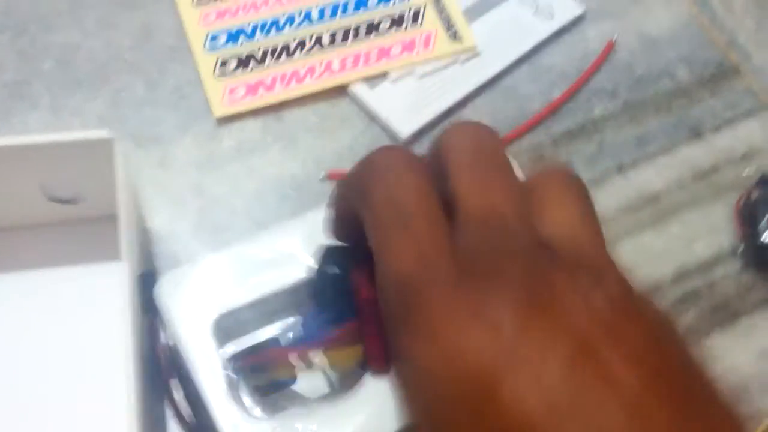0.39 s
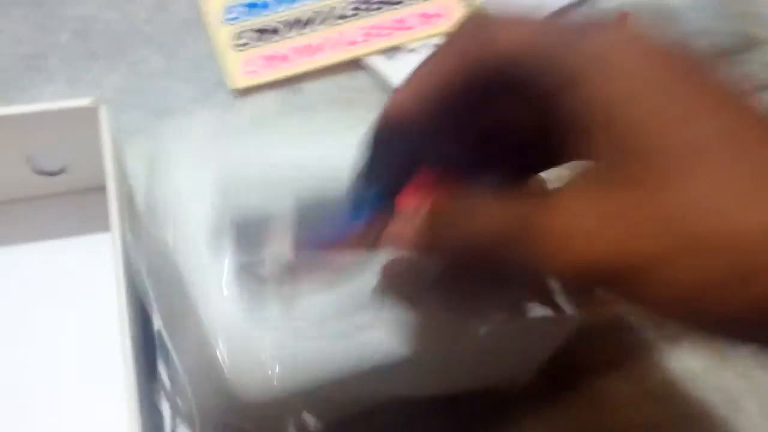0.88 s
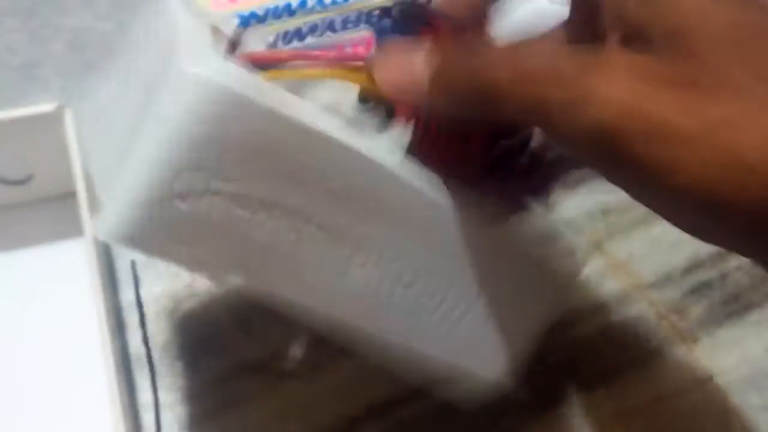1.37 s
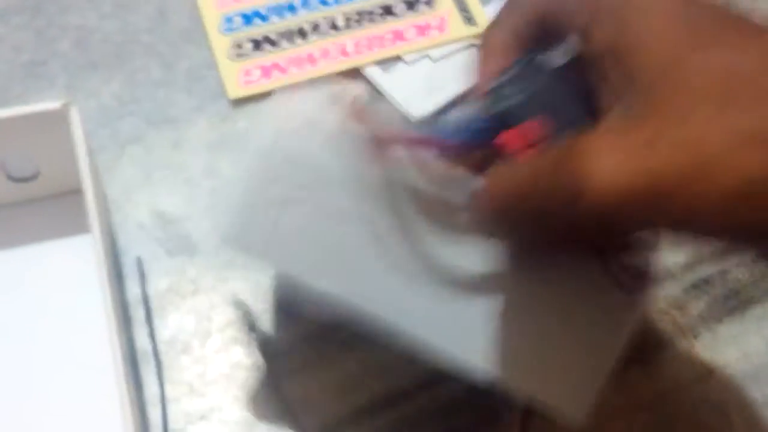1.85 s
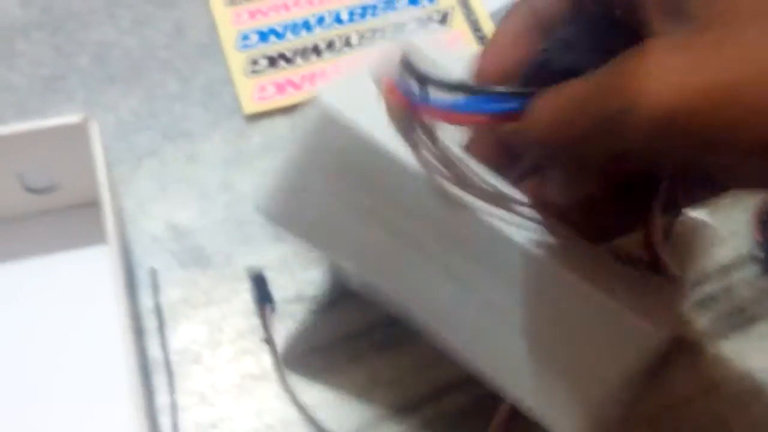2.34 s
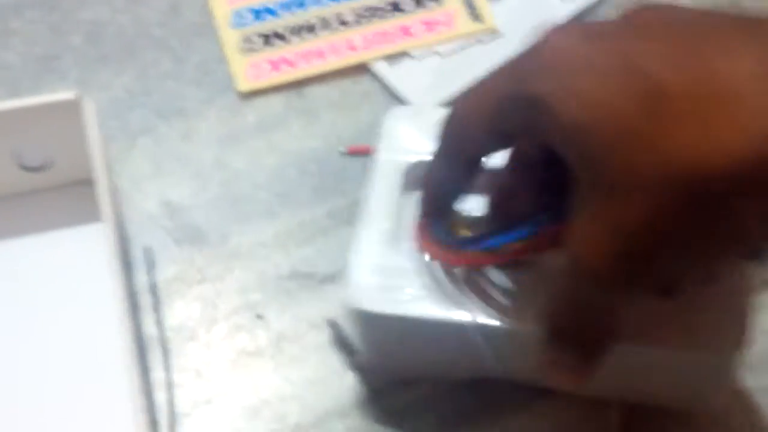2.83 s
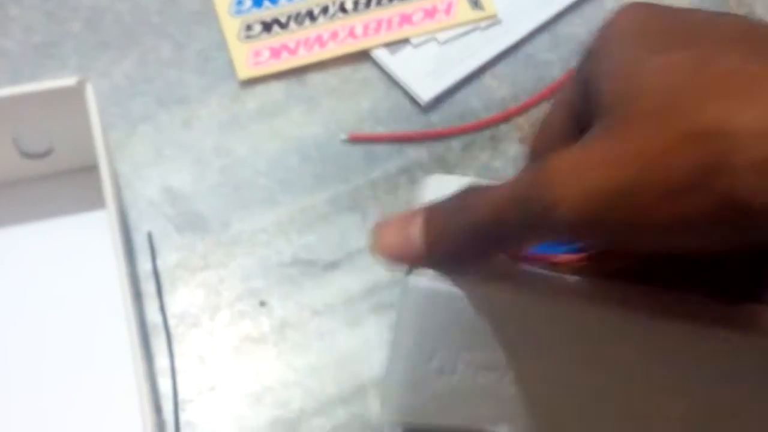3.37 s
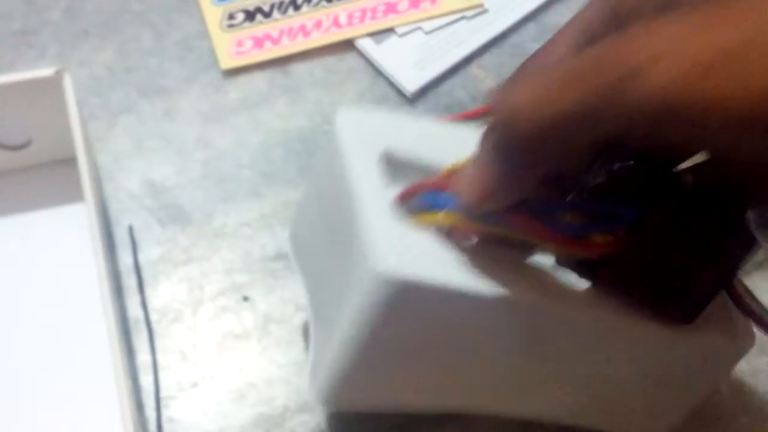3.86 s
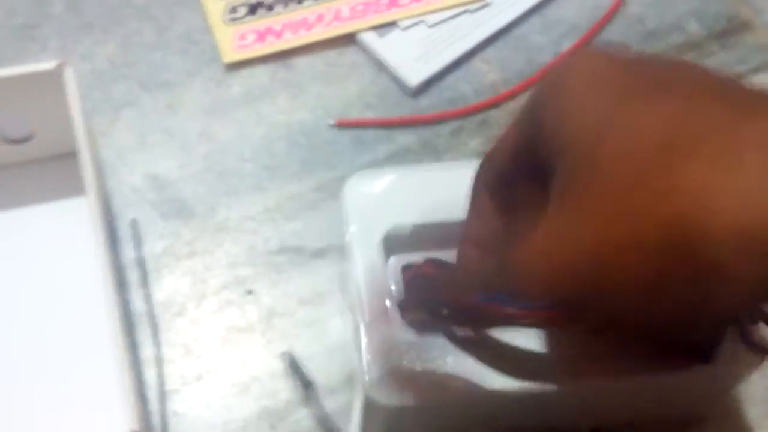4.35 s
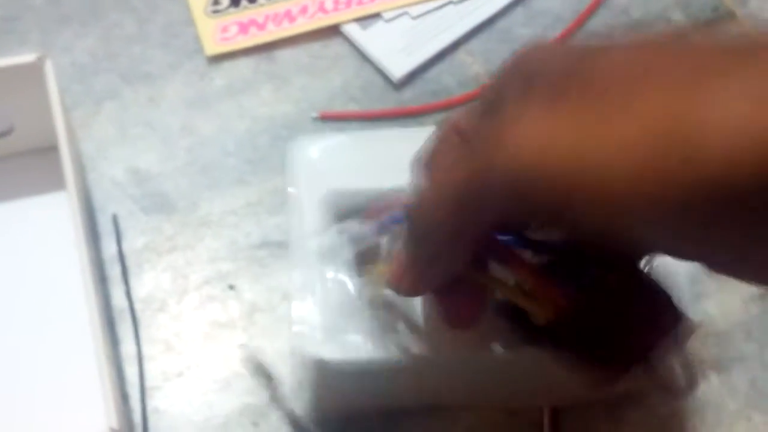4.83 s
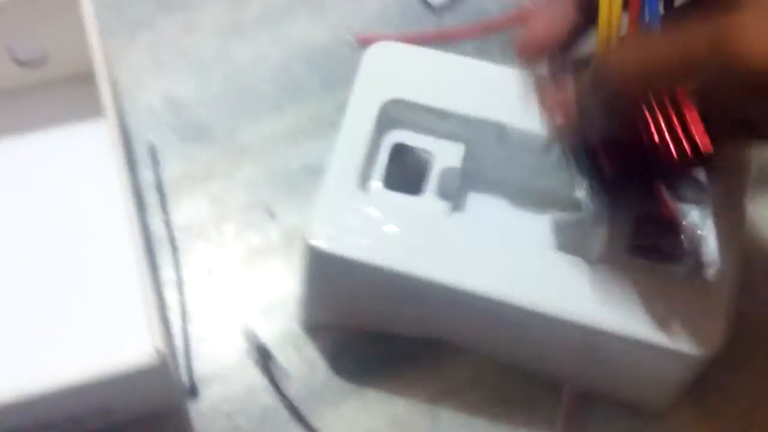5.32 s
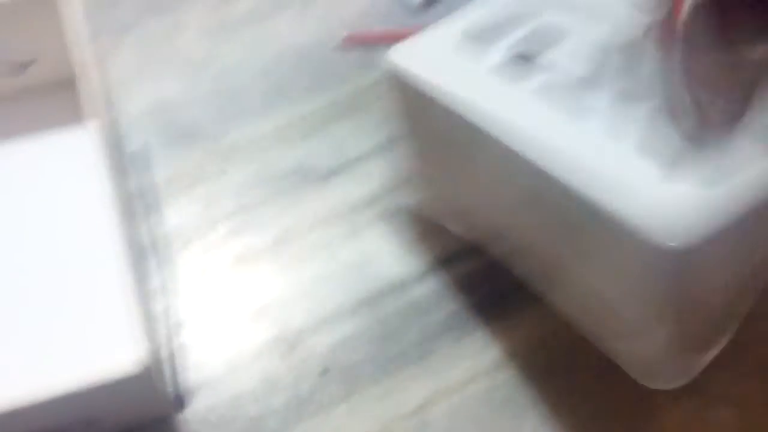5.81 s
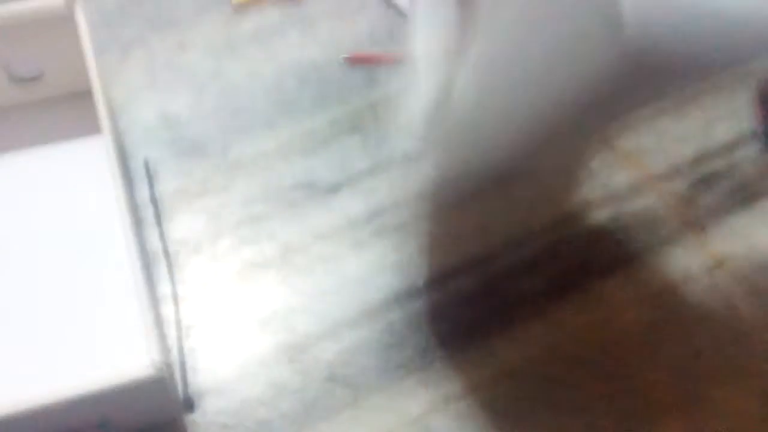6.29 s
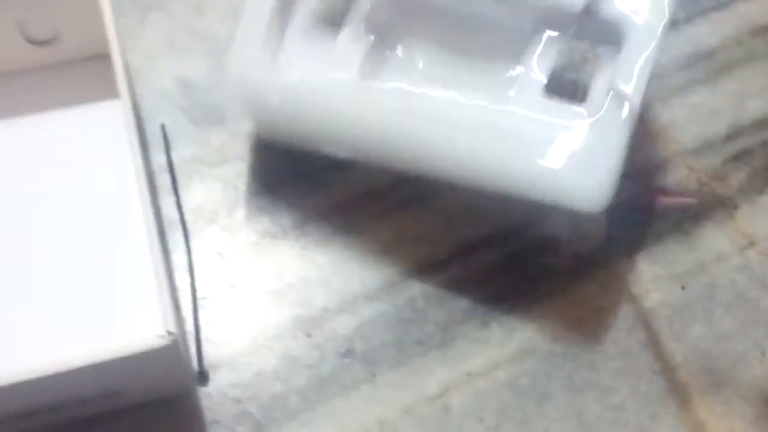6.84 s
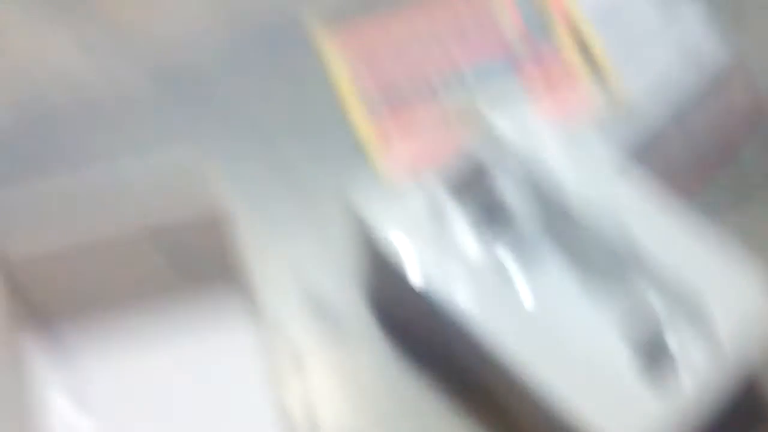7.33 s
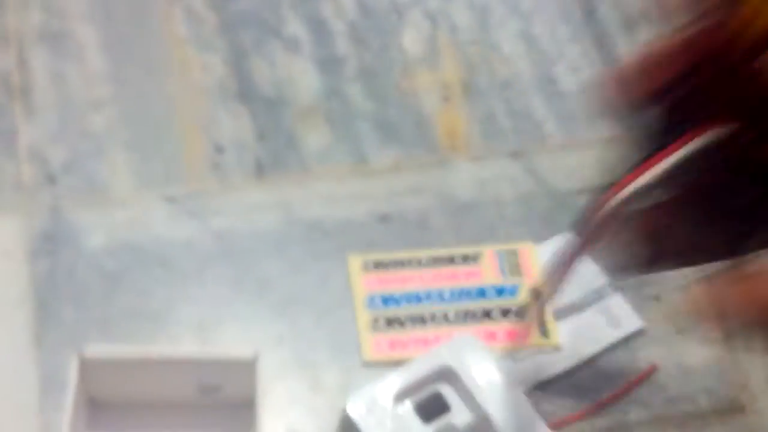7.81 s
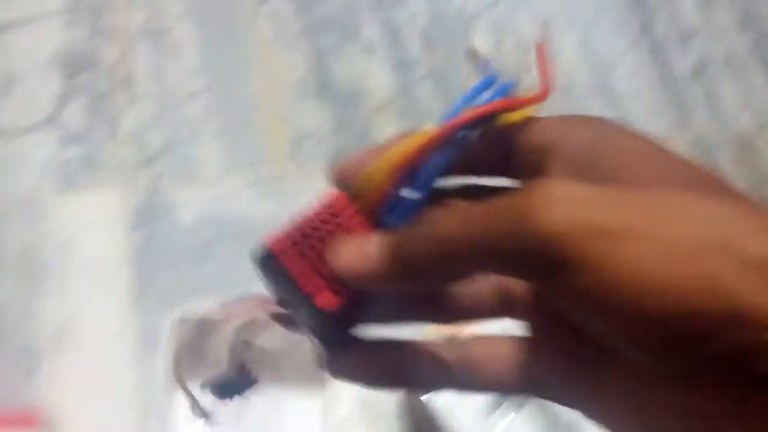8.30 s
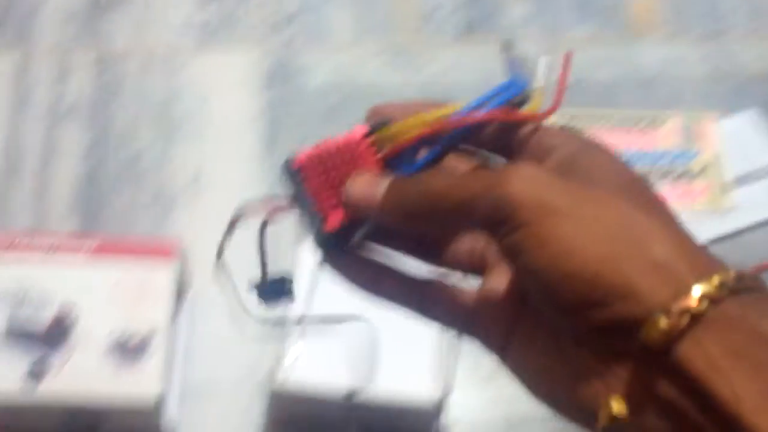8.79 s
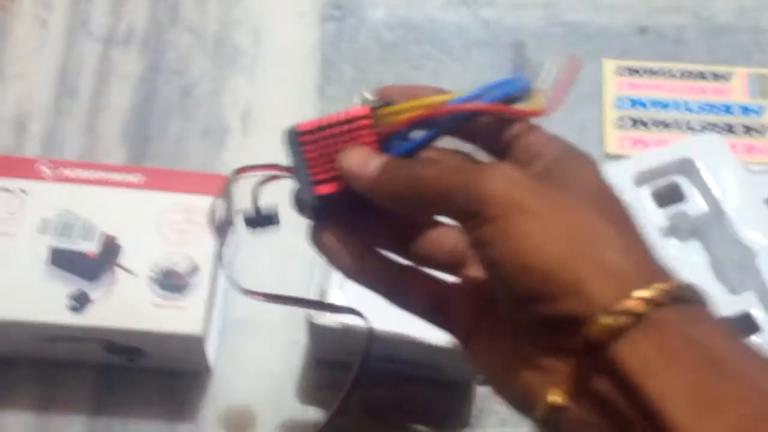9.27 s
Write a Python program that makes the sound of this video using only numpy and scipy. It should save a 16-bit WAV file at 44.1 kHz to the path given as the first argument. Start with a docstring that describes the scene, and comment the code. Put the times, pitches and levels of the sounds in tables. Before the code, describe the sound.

Brittle plastic buckles in dry, bright bursts, a hard snap early, then uneven crackling and rubbing that grows dense again before ending with low bumps on the floor. Afterwards just thin, bright ticks and faint rustles of wires over soft room air and hum. Close phone pickup in a small room, with slight overload on the strongest cracks.

```python
"""A thin moulded plastic tray on a stone floor, close to a phone: a hand works a small electronic part out of it.
Its walls buckle and snap as flurries of cracks ringing damped resonances, and wires scrape through its slots as
rubbing noise in the same resonances. It bumps the floor as low noise and soft thumps, and is dropped; then only
the wires tick, as short decaying tones, in a quiet room with a mains hum. The loudest snaps overload the phone."""
import sys
import numpy as np
from scipy import signal
from scipy.fft import rfft, irfft
from scipy.io import wavfile
from scipy.ndimage import uniform_filter1d

SR = 44100
rng = np.random.default_rng(int(sys.argv[2]) if len(sys.argv) > 2 else 0)


def master(y):
    """Save y as 16-bit WAV."""
    cut = np.clip(np.atleast_2d(y).T, -1, 1)
    pcm = np.round(cut * 32767)  # scale
    wavfile.write(sys.argv[1], SR, pcm.astype(np.int16))


def amplitude_ratio(level_db):
    """Convert a level in decibels to the matching linear amplitude (field) ratio."""
    exponent = np.asarray(level_db, float) / 20
    return 10 ** exponent


N = 426432

# the hand working the tray: (time [s], scrape level in the walls [dB], brightness [dB]);
# the ribs gain the brightness and the hollow loses it
HAND_WORK = [(0, -59.5, 2), (.3, -57, 1), (.55, -36.5, 5.5), (0.701, -53, 0), (0.869, -59, -1),
             (1.04, -45, 4), (1.22, -65, 2.5), (1.45, -70.5, 5), (1.7, -64.5, 1.5), (1.95, -49, 2.5),
             (2.2, -54.5, 6.5), (2.358, -67.5, 3.5), (2.6, -52, 0), (2.75, -55.5, 0.5), (2.95, -43, 3.5),
             (3.401, -46, .5), (3.57, -59.5, 1.5), (3.9, -46, 3.5), (4.201, -57.5, 2.5), (4.38, -42.5, -1),
             (4.6, -55, -0.5), (4.852, -50.5, 6.5), (5.08, -43.5, 3), (5.3, -50.5, -4.5), (5.6, -49, -0.5),
             (5.818, -68.5, 2), (6.099, -59.5, 4.5), (6.25, -44, 2), (6.75, -39.5, -3), (7.0, -55, 1.5),
             (7.2, -42.5, -10), (7.379, -85.5, -0.5)]
# tray resonances, broad because the thin plastic is heavily damped: (centre [Hz], width [Hz], level [dB])
HOLLOW_MODES = [(236, 260, -6.5), (409, 110, -5.5), (651, 73, -2.5), (985, 42, -0.5), (1240, 190, -1)]
WALL_MODES = [(1695, 590, -5), (2057, 218, 2.5), (2440, 320, 1.5), (2910, 910, -2.5)]
RIB_MODES = [(3780, 690, -7), (4440, 1000, -2), (5430, 910, -1.5), (6380, 500, -5.5), (6360, 1000, -12.5)]
FAMILIES = (HOLLOW_MODES, WALL_MODES, RIB_MODES)
OPPOSITE = np.array([[1], [-1]])  # left plus, right minus


def rms1(x):
    """Scale to unit rms."""
    return x / np.sqrt(np.mean(x ** 2))


def on_hz(table, count):
    """A (Hz, value) table read on the bins of a transform of count samples."""
    hz, value = np.transpose(table)
    bins_hz = np.arange(count // 2 + 1) * SR / count
    return np.interp(np.log(bins_hz + 1), np.log(hz), value)


def coloured(table):
    """Noise with the given spectrum, unit rms."""
    spectrum = rfft(rng.standard_normal(N)) * amplitude_ratio(on_hz(table, N))
    return rms1(irfft(spectrum, N))


def walk(rate):
    """Random levels held 1 / rate s and slewed twice, unit rms."""
    hold = int(SR / rate)
    steps = np.repeat(rng.standard_normal(N // hold + 1), hold)
    return rms1(uniform_filter1d(uniform_filter1d(steps, hold), hold)[:N])


def work_db(s):
    """Scrape level in hollow, walls and ribs at the times s; silent once the tray is dropped."""
    at, db, bright_db = np.transpose(HAND_WORK)
    wall_db = np.interp(s, at, db, right=-120)
    bright_db = np.interp(s, at, bright_db)
    return np.array([wall_db + 0.5 - bright_db, wall_db, wall_db + 2 + bright_db])


def rings(modes, count, scatter_db, bend):
    """Responses of a resonance family; grip and place of each blow shift pitch and weight."""
    hz, width, db = np.transpose(modes)[:, :, None]
    t = np.arange(1024) / SR
    chance = rng.standard_normal((count, 2, len(modes), 1))
    together = rng.standard_normal((count, 1, 1))  # the grip also bends the whole family at once
    bent_hz = hz * (1 + bend * (chance[:, 1] + together))
    shapes = np.exp(-np.pi * width * t) * np.cos(2 * np.pi * bent_hz * t)
    sign = (-1.) ** np.arange(len(modes))[:, None]  # neighbours in opposite sign leave no holes between them
    weight = np.sqrt(width) * amplitude_ratio(db + scatter_db * chance[:, 0]) * sign
    return np.sum(weight * shapes, axis=1)


def snaps():
    """Walls buckle: each snap is a flurry of tiny cracks that swells, dies and rings the three families."""
    # snaps and knocks: (time of the peak [s], energy in the walls [dB over 10 ms],
    # hollow [dB above the walls], ribs [dB above the walls], length [ms])
    snap_list = [(0.0314, -44.5, -4, -1, 6), (0.095, -42, -2, -3, 12), (0.1332, -33.5, -11, -17, 3.1),
                 (0.1695, -36.5, -22, 4, 4.1), (0.2584, -48.5, -4, 13, 3.6),
                 (0.3459, -41, -3.5, -3.5, 17.1), (0.364, -29, -20.5, 1.5, 5.7),
                 (0.4291, -35, -4, -3.5, 3.6), (0.4365, -29, -15.5, 3.5, 8), (0.4583, -28.5, -15, 8, 3),
                 (0.4655, -22, -2.5, -1.5, 11.8), (0.484, -15, -8, 2, 6.4), (0.4932, -8.5, -8, 0, 16.5),
                 (0.6156, -36.5, -7, 1.5, 8.0), (0.6268, -38.5, -5, 3, 10.8),
                 (0.6977, -30.5, -3.5, -5.5, 31), (0.8456, -50, -10, -1, 6.4),
                 (0.9559, -43.5, -1.5, -2.5, 5.8), (0.9853, -37.5, -5, 0, 5.0),
                 (1.0579, -44.5, -6, 7, 14.2), (1.0792, -42.5, -17, 1, 5.8), (1.1353, -46, -4.5, 1, 5.1),
                 (1.192, -39.5, -5.5, -4.5, 14), (1.2872, -43.5, -20, -0.5, 3.6),
                 (1.5543, -41, 1, -2.5, 30), (1.7108, -36, -18.5, -2, 12), (1.8014, -25.5, -6, -5.5, 7.3),
                 (1.852, -40.5, -15, 10.5, 4.2), (1.9239, -23, -2.5, -5, 23),
                 (1.9496, -27.5, -3.5, -5.5, 15.8), (1.9639, -30.5, -4, 3.5, 16.9),
                 (1.9884, -31.5, -5.5, 1.5, 3.9), (2.1138, -36.5, -7.5, 4.5, 4.4),
                 (2.1202, -31.5, -8, 7.5, 8.2), (2.131, -13.5, -10.5, 1.5, 12),
                 (2.2141, -37, -17.5, -0.5, 5.2), (2.4468, -36, -6, 0, 8.3), (2.466, -32.5, -12.5, -9, 14),
                 (2.5626, -37.5, -4.5, 1.5, 6.1), (2.5798, -28, -4, -7.5, 9.9),
                 (2.6453, -29, -11, -0.5, 8.6), (2.6613, -32.5, -13, -10, 5.8), (2.6819, -29.5, -22, -6, 9),
                 (2.697, -28.5, -14, -9.5, 9.3), (2.782, -39, 0, -4, 12), (2.8265, -40, -16, -4, 5.1),
                 (2.8424, -36.5, -20, -8.5, 5), (2.8633, -31.5, -13, -4, 5.5),
                 (2.8786, -30.5, -5.5, -2.5, 7.9), (2.8903, -32, -0.5, 7, 7.2),
                 (2.9671, -23.5, -16, -7, 6.1), (2.9919, -38, -14, 3, 4.7), (3.02, -28.5, -20, -4.5, 7),
                 (3.0417, -28.5, -4, 1, 3.9), (3.0684, -41.5, -3, 13, 3), (3.0815, -30, -17, 5.5, 2.9),
                 (3.1478, -38, -5.5, 10, 4.8), (3.1522, -32.5, -8.5, 6, 5.6),
                 (3.2029, -37.5, -6.5, -3.5, 6.7), (3.2186, -41.5, -2.5, -2.5, 20.5),
                 (3.2651, -54, 3.5, 17.5, 4.9), (3.2907, -35.5, -2, 3, 7.8), (3.3156, -35, -9.5, 8.5, 6.3),
                 (3.3301, -28.5, -17.5, -7, 3), (3.3584, -36, -8, 2.5, 19), (3.3699, -30.5, -6.5, 1.5, 6.2),
                 (3.387, -34, -16, 1.5, 8.0), (3.4012, -35.5, -5, -4, 6.3), (3.4589, -28, -3.5, 0, 5.3),
                 (3.488, -35.5, 0.5, 2.5, 10.4), (3.514, -29.5, -17, 0.5, 5.4),
                 (3.6125, -42.5, -6, -7, 3.9), (3.6239, -43.5, -8, -4, 3), (3.6628, -26, -14, 4, 3.9),
                 (3.7639, -36.5, -12.5, -4, 4.4), (3.8464, -17.5, -16.5, 6, 8.7),
                 (3.8668, -32, -6.5, 9.5, 15.9), (3.8795, -24.5, -13, 1.5, 6.5),
                 (3.9768, -35, -11.5, 2, 7.2), (3.9884, -17, -17, 5, 5.3), (4.0904, -38, 3.5, 1, 16.6),
                 (4.1206, -45, -3, 23, 2.5), (4.2535, -36, 0, 2.5, 5.2), (4.3015, -22.5, -10.5, -4.5, 17),
                 (4.315, -18, -10.5, -1.5, 7.2), (4.3405, -24.5, -0.5, -4, 16),
                 (4.4207, -37.5, -8, -6.5, 8.6), (4.4594, -31, -4.5, 2, 6.5), (4.4688, -24.5, -13, -7, 7.3),
                 (4.4947, -29, -12, -7, 2.7), (4.5416, -43.5, -1.5, 4, 9.5), (4.7274, -41, -5, 4, 8.8),
                 (4.7927, -29, -12, 1, 3.6), (4.8021, -25, -6, -1, 6.7), (4.8154, -30.5, -7.5, -5, 17),
                 (4.8347, -21.5, -15.5, -9, 3.1), (4.8904, -41, -24, 11, 2.4),
                 (4.93, -10.5, -29.5, -9, 3.7), (4.942, -25, -6, -2, 4.6), (4.9865, -9.5, -14, -3.5, 17),
                 (5.0127, -18, -11, 2.5, 7.1), (5.0234, -25, -6, 4, 12.6), (5.1089, -33, -1.5, 0, 19.8),
                 (5.133, -34.5, 5.5, -2.5, 37), (5.1757, -26.5, -4.5, -2, 7.9),
                 (5.3052, -38.5, 3.5, -11, 25), (5.3775, -20, -1.5, -6.5, 10), (5.4857, -35, 3, -10.5, 5.5),
                 (5.5083, -39, 6, -8.5, 10), (5.5735, -38.5, 2, -8, 5.8), (5.6282, -36, -14, -7.5, 14),
                 (5.7324, -49.5, 5, 3.5, 23), (5.883, -32, -25, 4.5, 6.9), (5.9342, -41.5, -18, -4, 3.1),
                 (5.979, -30.5, -11.5, 0, 9.6), (5.9976, -23.5, -1, -1.5, 16), (6.0219, -29.5, -2.5, 1, 16),
                 (6.062, -40, -0.5, 4, 5.1), (6.1612, -33, -13, -5, 5.7), (6.1715, -28, -11.5, -1.5, 12.0),
                 (6.1937, -21.5, -6, 3, 10.4), (6.2252, -22.5, -12, -6, 11), (6.302, -25.5, -8, -3.5, 13),
                 (6.3369, -25, -9, 2.5, 9.4), (6.3479, -23, -5.5, 1, 13.0), (6.3616, -28, -4, -2, 11.1),
                 (6.37, -25.5, -12, -4.5, 14.0), (6.3908, -22.5, -19, 0.5, 5.3),
                 (6.4207, -32.5, -11, 2, 8.0), (6.432, -29, -11.5, -8.5, 6.5),
                 (6.5082, -23, -15.5, -3.5, 10.8), (6.5297, -19.5, -19, 4, 5.8),
                 (6.5383, -17, -15.5, -1.5, 9.9), (6.5517, -22, -16.5, 6.5, 12.9),
                 (6.5641, -14, -20.5, 1.5, 15.4), (6.5821, -18, -16.5, -1, 13), (6.6647, -10, -15, 0.5, 13),
                 (6.691, -21, -11, -2, 9.4), (6.7005, -23, -6, -1, 20), (6.8683, -33.5, -3.5, -0.5, 20),
                 (6.8917, -23.5, -9.5, -5.5, 15), (6.9693, -39, -3, 1.5, 10.5),
                 (7.0389, -18, -2.5, -3, 12.7), (7.057, -30.5, -1.5, -1, 6.1),
                 (7.0654, -24.5, -2, -1.5, 10.9), (7.1136, -16.5, -4.5, -6, 21), (7.1439, -29.5, 1, -6, 18),
                 (7.1813, -26.5, 0, -8.5, 8.6), (7.1964, -30, 3.5, -10.5, 24.6)]
    s, wall_db, hollow_db, ribs_db, length = np.transpose(snap_list)
    family_db = np.array([wall_db + hollow_db, wall_db, wall_db + ribs_db])

    # lesser snaps come at random while the hand works, about as loud as the scrape
    small_per_s, small_mean_ms = 60, 2.6
    small_db, level_scatter_db, colour_scatter_db = 0.5, 4.5, 4  # above the scrape; scatters are limits either way
    when, size = rng.random((600, 2)), rng.uniform(-1, 1, (600, 4))
    at = np.cumsum(-np.log(1 - when[:, 0]) / small_per_s)
    on = at < HAND_WORK[-1][0]
    lesser_db = work_db(at) + small_db + level_scatter_db * size[:, 0] + colour_scatter_db * size[:, 1:].T
    lesser_length = -small_mean_ms * np.log(1 - when[on, 1])
    s = np.r_[s, at[on]]
    length = np.r_[length, lesser_length][:, None]
    family_db = np.c_[family_db, lesser_db[:, on]][:, :, None]

    # shares of the length taken by rise and fall, each to -10 dB; the start is abrupt
    rise, fall = np.maximum(0.31 * length, .1), np.maximum(0.59 * length, .15)
    ms = (np.arange(3072) - 1024) * 1000 / SR
    swell = np.where(ms < 0, (ms / rise) ** 4, ms / fall)
    chance = rng.standard_normal((len(s), 2, 3072))
    flurry = chance[:, 0] * amplitude_ratio(3.0 * chance[:, 1] - 10 * swell)
    cracks = rfft(flurry + 3.2 * (ms == 0), 4096)  # one main crack at the peak
    sound = 0
    for modes, db in zip(FAMILIES, family_db):
        response = rfft(rings(modes, len(s), scatter_db=1.0, bend=0.059), 4096)
        ring = irfft(cracks * response, 4096)
        energy = np.sum(ring ** 2, axis=1, keepdims=True)
        sound = sound + amplitude_ratio(db) * ring / np.sqrt(energy / (SR / 100))
    out = np.zeros(N + 8192)
    for start, blow in zip((s * SR).astype(int), sound):
        out[start:start + 4096] += blow
    return out[1024:N + 1024]


def scrape():
    """Wires and fingers drag over the plastic in fits: a fine rub and small cracks ring the same families."""
    fits = amplitude_ratio(1.3 * walk(90) + 1.5 * walk(25))
    rub = rng.standard_normal(N)
    struck = rng.random(N) < 1100 / SR  # 1100 small cracks per second
    cracks = struck * rng.standard_normal(N) * amplitude_ratio(4.0 * rng.standard_normal(N))
    # the grip shifts every 50 ms or so among five, and the colour with it
    held = np.repeat(rng.integers(0, 5, N // 2048 + 1), 2048)[:N]
    grip = held == np.arange(5)[:, None]
    drag = grip * fits * (0.75 * rub + rms1(cracks))
    out = 0
    for modes, db in zip(FAMILIES, work_db(np.arange(N) / SR)):
        responses = rings(modes, count=5, scatter_db=5.0, bend=0.08)
        ring = signal.oaconvolve(drag, responses, axes=1).sum(axis=0)[:N]
        out = out + rms1(ring) * amplitude_ratio(db)
    return out


def tick(hz):
    """A loose wire's tick: a sine of a cycle or two, its bandwidth a fifth of its pitch."""
    t = np.arange(256) / SR
    return np.exp(-np.pi * 0.2 * hz * t) * np.sin(2 * np.pi * hz * t)


def wires():
    """Loose wires tick against each other, thin and bright, over short faint rustles of tinier ticks."""
    # single ticks, before the bass is cut: (time [s], peak level [dB], centre [Hz])
    tick_list = [(7.5353, -31, 5140), (7.559, -38.5, 3360), (7.656, -37, 3380), (7.731, -38.5, 4610),
                 (7.7464, -44, 6480), (7.78, -42, 4320), (7.8095, -34.5, 3880), (7.8585, -47, 5860),
                 (7.926, -47, 4370), (7.9657, -47, 5300), (8.1231, -17, 5720), (8.1477, -48.5, 5560),
                 (8.1672, -25.5, 6000), (8.463, -33.5, 5150), (8.852, -45, 3900), (8.9484, -23, 5550),
                 (8.9722, -34, 1990), (9.0332, -32, 5940), (9.5351, -35, 4760)]
    # rustles while the hand gathers the wires: (middle [s], half length to -10 dB [s], level [dB])
    rustle_list = [(7.585, .08, -60), (7.831, 0.17, -57), (8.189, 0.078, -60.5), (8.976, 0.039, -62.5)]
    struck = rng.random(N) < 800 / SR  # 800 tiny ticks per second
    tiny = struck * rng.standard_normal(N) * amplitude_ratio(3.1 * rng.standard_normal(N))
    t = np.arange(N) / SR
    swell = sum(amplitude_ratio(db - 10 * ((t - s) / half) ** 2) for s, half, db in rustle_list)
    rustle = rms1(np.convolve(tiny, tick(5230))[:N])
    out = rustle * swell * amplitude_ratio(2.5 * walk(25))
    for s, peak_db, hz in tick_list:
        start = int(s * SR)
        out[start:start + 256] += amplitude_ratio(peak_db) * tick(hz) / tick(hz).max()
    return signal.sosfilt(signal.butter(4, 1920, "high", fs=SR, output="sos"), out)


def bumps():
    """Dull handling rumble through floor and phone, and soft thumps of two or three cycles, alike at both ports."""
    # rumble through floor and phone: (time [s], level [dB])
    rumble_level = [(0, -54), (0.5, -44.5), (0.801, -54), (1.399, -56.5), (1.9, -43), (2.3, -51),
                    (3.6, -55.5), (4.1, -48), (5.2, -49), (5.8, -55.5), (6.3, -41.5), (7.2, -37.5),
                    (7.451, -58), (9.67, -63.5)]
    # rumble spectrum: (frequency [Hz], relative density [dB per Hz])
    rumble_colour = [(25, -24), (55, -3.5), (100, 0.5), (140, -6.5), (250, -14.5), (400, -20), (700, -44.5)]
    # soft thumps of fingers, tray and floor: (time of the peak [s], level, 1.5 dB over the sine's peak [dB],
    # pitch [Hz])
    thump_list = [(0.079, -35, 66), (0.175, -36, 74), (0.503, -28, 143.5), (1.712, -31, 131),
                  (1.946, -31, 114), (2.3, -32.5, 119), (2.475, -35, 93), (3.372, -36, 116),
                  (3.469, -34.5, 141), (4.056, -34, 85), (4.088, -32, 102), (4.238, -33, 96),
                  (4.821, -32, 175), (4.998, -28, 128.7), (5.383, -31, 158), (5.498, -35, 126),
                  (6.285, -26.5, 157), (6.657, -21, 170), (6.743, -29, 117), (6.805, -24, 111),
                  (6.99, -31, 137), (7.039, -31, 126), (7.106, -23, 98), (7.16, -29, 101),
                  (7.204, -30, 100), (7.257, -31, 108), (7.304, -28.5, 95)]
    s, db = np.transpose(rumble_level)
    level = amplitude_ratio(np.interp(np.arange(N) / SR, s, db) + 2.0 * walk(20))
    side = amplitude_ratio(-24) * coloured(rumble_colour) * OPPOSITE  # the ports differ only slightly
    out = level * (coloured(rumble_colour) + side)
    t = np.arange(-2048, 2048) / SR
    for (at, peak_db, hz), turn in zip(thump_list, rng.random(len(thump_list))):
        swell = np.exp(-(t * hz / np.where(t < 0, .9, 1.5)) ** 2)  # rises faster than it falls
        thump = amplitude_ratio(peak_db - 1.5) * swell * np.sin(2 * np.pi * (hz * t + turn))
        middle = int(at * SR)
        out[:, middle - 2048:middle + 2048] += thump
    return out


def room_tail():
    """Decaying noise for the small room: the treble dies sooner and differs more between the ports."""
    room_db, t60_s, treble_t60_s = -8, 0.22, 0.17  # energy of the shared part against the direct sound
    t = np.arange(SR // 2) / SR
    noise = rng.standard_normal((2, len(t))) * np.minimum(t / 0.0013, 1)
    low = signal.sosfilt(signal.butter(2, 3000, fs=SR, output="sos"), noise)
    alike, unlike = low * amplitude_ratio(-60 * t / t60_s) + (noise - low) * amplitude_ratio(-60 * t / treble_t60_s)
    unlike = signal.sosfilt(signal.butter(1, 2500, "high", fs=SR, output="sos"), unlike)
    return amplitude_ratio(room_db) / np.sqrt(np.sum(alike ** 2)) * (alike + 0.34 * unlike * OPPOSITE)


def at_ports(x):
    """Close sound and its room tail reach two ports on the phone body, each with its own lead and shade."""
    # lead of the left port: (frequency [Hz], phase [radians])
    port_phase = [(600, .1), (2500, .2), (3600, .8), (4700, 1.9), (5700, 2.1), (8000, 2.2)]
    # shade of the body: (frequency [Hz], left minus right [dB])
    port_db = [(150, 0), (520, 2), (1200, 4), (2600, 2), (6000, 3)]
    turn = amplitude_ratio(on_hz(port_db, N) / 2) * np.exp(.5j * on_hz(port_phase, N))
    direct = x * amplitude_ratio(1.4 * walk(30) * OPPOSITE)  # the tray moves between the ports
    wet = direct + signal.fftconvolve(x[None], room_tail())[:, :N]
    return irfft(rfft(wet) * np.array([turn, 1 / turn]), N)


def quiet_room():
    """Steady room air as coloured noise, most alike left and right in the bass, and a wavering mains hum."""
    # spectrum of the air: (frequency [Hz], relative density [dB per Hz])
    air_colour = [(30, -28), (50, -17), (100, -16), (140, -15.5), (350, -26.5), (700, -31.5), (1400, -38),
                  (4500, -36), (8000, -43)]
    # spread of the air: (frequency [Hz], side minus mid [dB])
    air_side = [(60, -12), (200, -6), (900, -3), (2650, -1), (7800, 9)]
    noise = rfft(rng.standard_normal((2, N))) * amplitude_ratio(on_hz(air_colour, N))
    mid, side = irfft(noise * amplitude_ratio([np.zeros(N // 2 + 1), on_hz(air_side, N)]), N)
    air = amplitude_ratio(-60.5) / np.std(mid) * (mid + side * OPPOSITE)
    hum_phase = 2 * np.pi * 100 * np.arange(N) / SR + 0.24 * walk(5.4)  # 100 Hz
    hum = amplitude_ratio(-58 + 1.7 * walk(7.7)) * np.sqrt(2) * np.sin(hum_phase)
    return air + hum


def scene():
    """Tray and wire sounds through ports and room, over bumps and the quiet room."""
    return at_ports(snaps() + scrape() + wires()) + bumps() + quiet_room()


def low_pass(x):
    """Removes everything above the highest recorded frequency."""
    return signal.sosfilt(signal.butter(12, 8410, fs=SR, output="sos"), x)


def record(dry):
    """The phone drops the deepest bass, rolls off and cuts the treble, then clips the loudest snaps flat."""
    soft = signal.sosfilt(signal.butter(2, 38, "high", fs=SR, output="sos"), dry)
    soft = signal.sosfilt(signal.butter(6, 7100, fs=SR, output="sos"), soft)
    cut = signal.sosfilt(signal.ellip(8, .2, 80, 8220, fs=SR, output="sos"), soft)
    return low_pass(np.clip(cut, -1, 1))


dry = scene()
out = record(dry)
master(out)
```